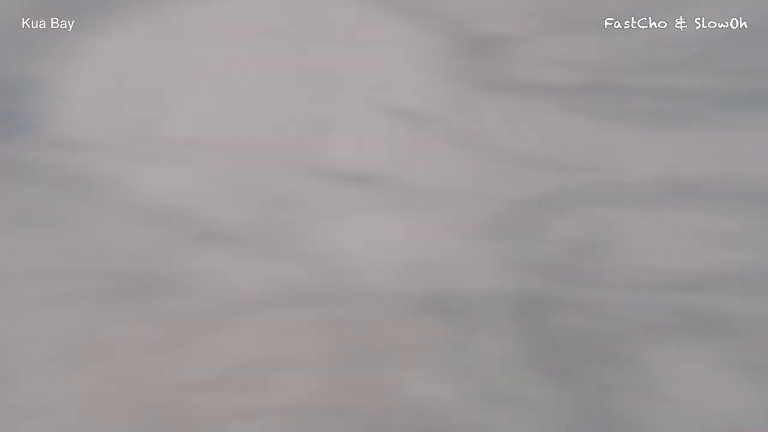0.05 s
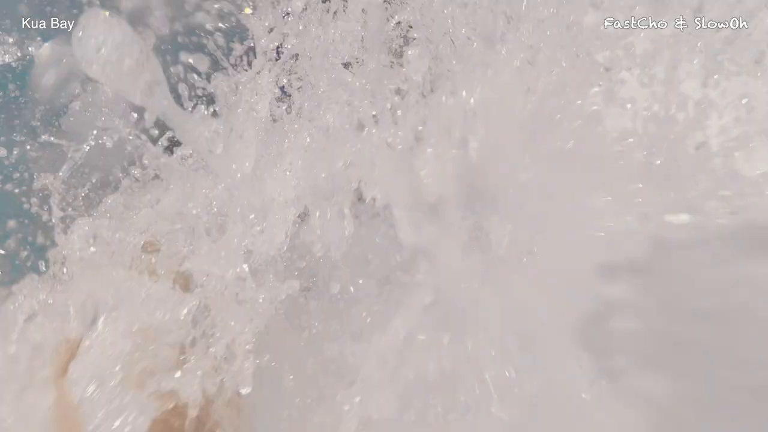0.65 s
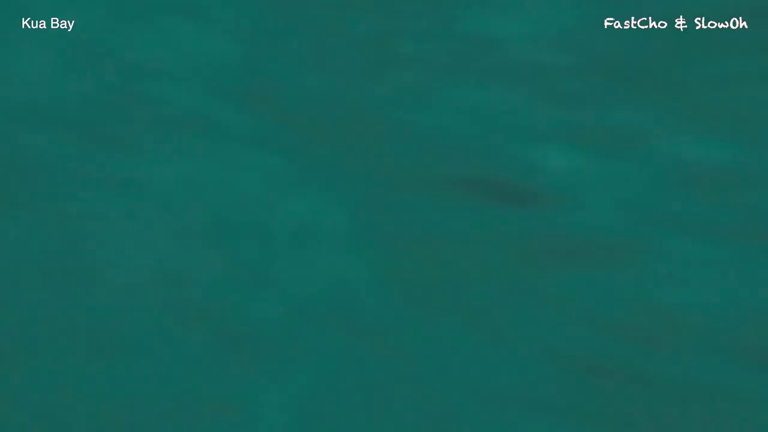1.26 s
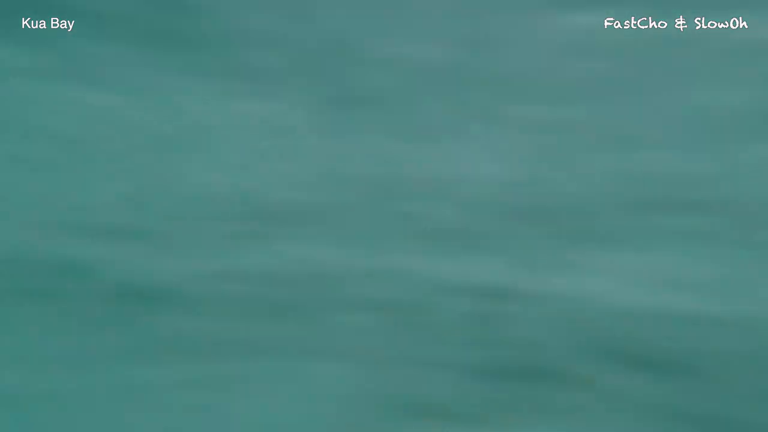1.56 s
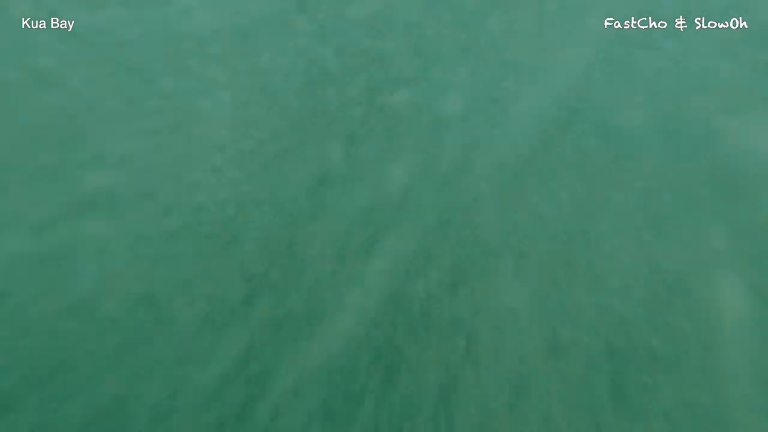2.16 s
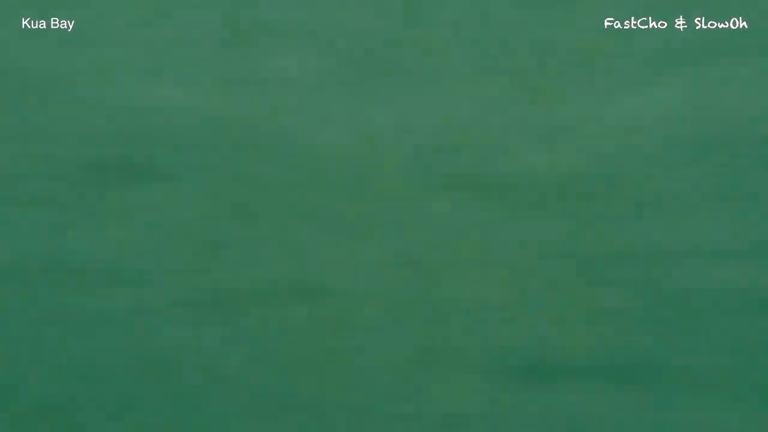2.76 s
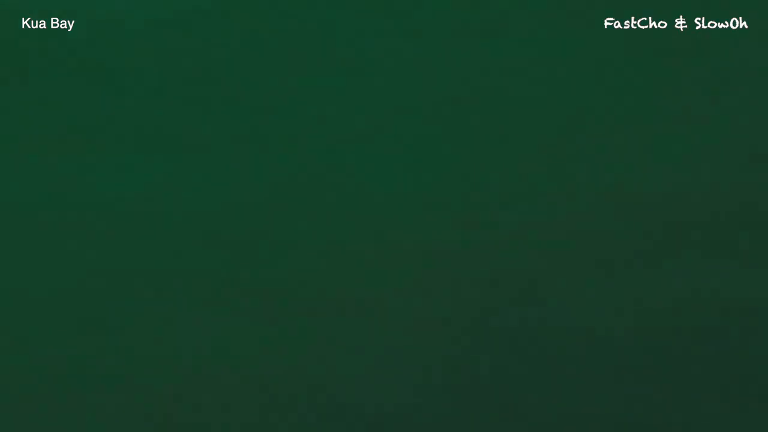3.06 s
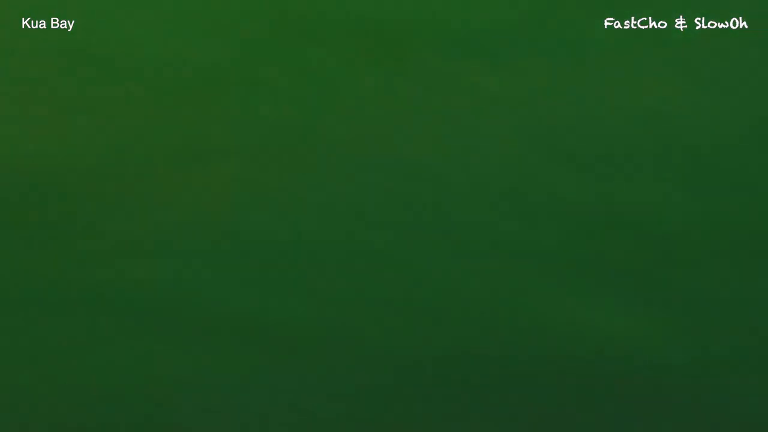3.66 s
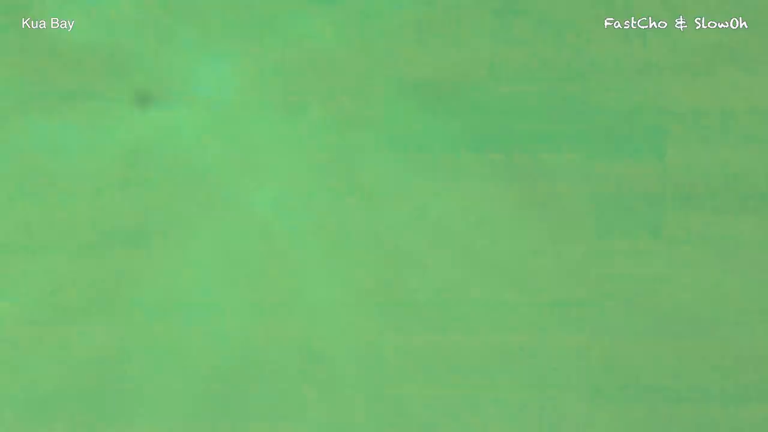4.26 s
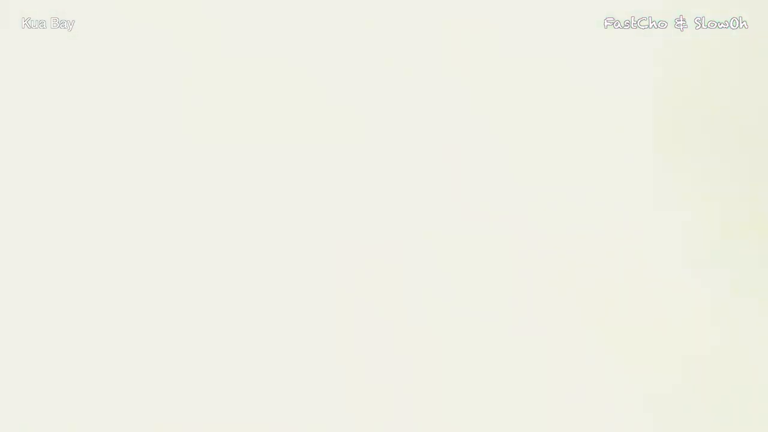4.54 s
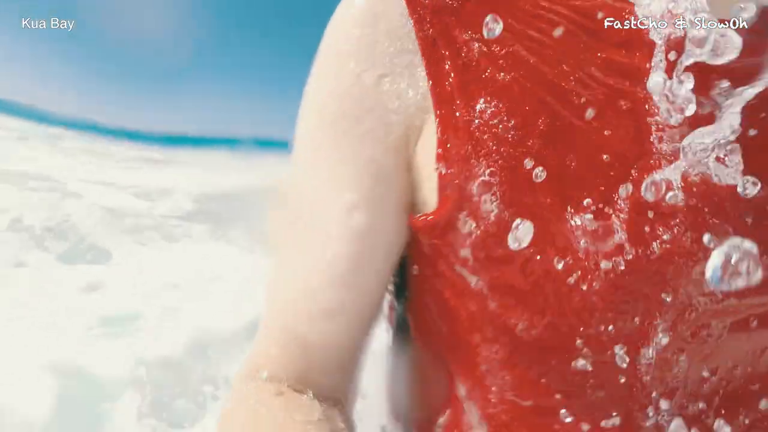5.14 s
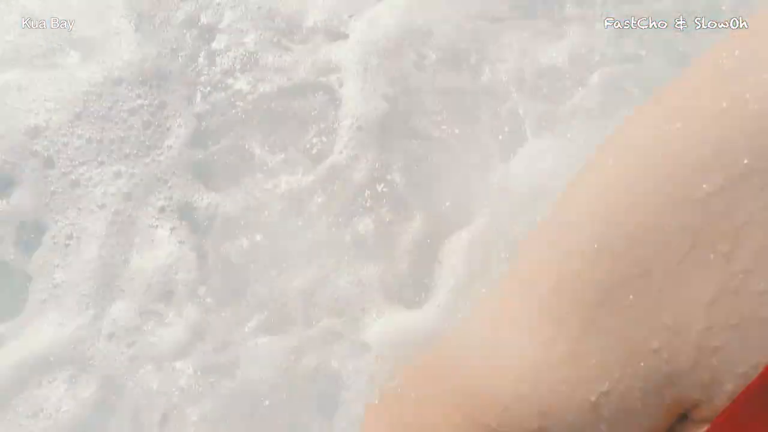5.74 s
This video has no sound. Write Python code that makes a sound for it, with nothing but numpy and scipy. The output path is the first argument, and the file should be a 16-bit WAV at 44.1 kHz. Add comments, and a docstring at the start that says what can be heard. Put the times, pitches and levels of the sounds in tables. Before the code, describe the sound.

A wave crashes over a waterproof camera, churning and gurgling underwater with sharp knocks, then gives way to quiet, muffled surf.

```python
"""A breaking wave runs over a small camera in a waterproof case, pushes it under and lets it up again.
Turbulent eddies buffet the case, and clouds of bubbles churn, gurgle and fizz: each bubble is a
damped oscillator, higher in pitch the smaller it is. Spray excites the modes of the plastic shell.
Back in the air, only the dull wash of the surf and a few splashes are transmitted through it."""
import sys
import numpy as np
from scipy import signal
from scipy.fft import rfft, irfft
from scipy.io import wavfile
from scipy.ndimage import uniform_filter1d

SR = 44100
rng = np.random.default_rng(int(sys.argv[2]) if len(sys.argv) > 2 else 0)


def wav_out(sig):
    """Save sig, one row per channel (or a flat mono array), as 16-bit PCM at SR to the path in sys.argv[1]."""
    wavfile.write(sys.argv[1], SR, np.round(np.clip(np.atleast_2d(sig).T, -1, 1) * 32767).astype(np.int16))


N = 264600


def amp(db):
    """Amplitude ratio of a level in decibels."""
    return 10 ** (np.asarray(db) / 20)


def unit(x):
    """Normalisation to rms 1."""
    return x / np.sqrt(np.mean(x ** 2) + 1e-20)


def add(mix, start_s, sound):
    """Superposition of a delayed sound on the mix."""
    part = mix[max(round(start_s * SR), 0):][:len(sound)]
    part += sound[:len(part)]


def colour(x, spectrum):
    """Minimum-phase filtering to a (Hz, dB) outline: being causal, it keeps the fronts of clicks sharp."""
    hz, db = np.transpose(spectrum)
    size = 16384
    bin_hz = abs(np.fft.fftfreq(size, 1 / SR)) + 1
    log_gain = np.log(amp(np.interp(np.log(bin_hz), np.log(hz), db)))
    response = np.exp(np.conj(signal.hilbert(log_gain)))
    taps = np.fft.ifft(response).real[:size // 2]
    return signal.oaconvolve(x, taps)[:len(x)]


def band(x, low_hz, high_hz):
    """Band-pass filtering with gentle slopes."""
    return signal.sosfilt(signal.butter(2, [low_hz, high_hz], "band", fs=SR, output="sos"), x)


def wander(rate_hz):
    """Low-pass noise: a smooth random fluctuation of rms 1."""
    hz = np.fft.rfftfreq(N, 1 / SR)
    return unit(irfft(rfft(rng.standard_normal(N)) * np.exp(-(hz / rate_hz) ** 2), N))


def steady(x, span_s):
    """Running normalisation to rms 1; fluctuations faster than the span remain."""
    size = int(span_s * SR)
    power = uniform_filter1d(uniform_filter1d(x ** 2, size), size)
    return x / np.sqrt(abs(power) + 1e-12)


def curves(rows):
    """Linear interpolation in time: one curve for each column after the first."""
    times, *columns = np.transpose(rows)
    return [np.interp(np.arange(N) / SR, times, column) for column in columns]


def swells(rows, rise_s=0.02, fall_s=0.04):
    """Summed trapezoidal envelopes, a dB curve per column: water arrives, stays and drains away."""
    total_db = 0
    for start, length, *rises_db in rows:
        full, end = start + min(rise_s, 1.1 * length), start + length
        envelope, = curves([(start, 0), (full, 1), (end, 1), (end + fall_s, 0)])
        total_db += np.outer(rises_db, envelope)
    return total_db


def pops(per_s, spread_db):
    """A Poisson process of clicks of either sign: many small, a few large."""
    size = amp(spread_db * np.minimum(rng.exponential(1, N), 5))
    return size * rng.choice([-1, 1], N) * (rng.random(N) < per_s / SR)


def bubbles(low_hz, high_hz, per_s, cycles, spread_db, sizes=24):
    """Bubble resonance: each falls 60 dB over its cycles while rising a little in pitch."""
    births = pops(per_s, spread_db)
    size_class = rng.integers(0, sizes, N)
    cloud = np.zeros(N)
    for k, hz in enumerate(np.geomspace(low_hz, high_hz, sizes)):
        age = np.arange(0, 1, hz / (cycles * SR))
        ring = np.sin(2 * np.pi * cycles * age * (1 + 0.07 * age)) * amp(-60 * age)
        ring *= 1 - np.exp(-age / 0.061)  # the neck takes a moment to pinch off
        cloud += signal.oaconvolve(births * (size_class == k), ring * np.sqrt(hz))[:N]
    return unit(cloud)


def swing(peak_db, hz, t60):
    """Pressure of a damped oscillator with a rounded onset."""
    t = np.arange(SR // 4) / SR
    wave = np.sin(2 * np.pi * hz * t) * amp(-60 * t / t60) * (1 - np.exp(-t / (0.064 * t60)))
    return amp(peak_db) * wave / abs(wave).max()


# Spectrum of the buffeting: (frequency [Hz], level [dB])
EDDY_SPECTRUM = [(8, -0.5), (20, -1.5), (36, 3.5), (70, -5.5), (110, -11.5), (180, -34), (400, -52),
                 (900, -100)]

def eddies(span_s):
    """Turbulent pressure fluctuations shake the case with a low rumble."""
    return steady(colour(rng.standard_normal(N), EDDY_SPECTRUM), span_s)


# Spectrum of the surf inside the shell: (frequency [Hz], level [dB])
WASH_SPECTRUM = [(60, -12), (130, -2.5), (240, 3), (330, -6.5), (560, -17), (930, -9), (1150, -21),
                 (1400, -15.5), (1750, -23), (3000, -31), (8000, -56)]

def surf_wash():
    """Transmission loss in the shell dulls the airborne noise of the surf."""
    wash = steady(colour(rng.standard_normal(N), WASH_SPECTRUM), span_s=0.081)
    return wash * amp(2.7 * wander(43))


# Spectrum of settling foam: (frequency [Hz], level [dB])
HISS_SPECTRUM = [(1000, -15), (1950, -7), (2350, -4), (2650, 0.5), (2950, -8), (3400, -4), (3900, -4.5),
                 (5000, -14), (6800, -16), (9000, -22), (11000, -27), (15000, -26)]

def settling_foam():
    """Tiny bursting bubbles add incoherently to a hiss; a few ring out singly."""
    hiss = unit(colour(rng.standard_normal(N) + 1.23 * unit(pops(3000, 6.4)), HISS_SPECTRUM))
    return hiss + amp(-14.5) * bubbles(2800, 9000, per_s=250, cycles=19, spread_db=14)


# Levels above the surface: (time [s], rocking [dB], wash [dB])
SHORE_LEVELS = [(4.8, -51, -52.5), (4.97, -57, -60), (5.4, -58, -56), (5.55, -38.5, -52.5),
                (5.7, -37.5, -54), (6, -36, -51.5)]
# Wavelets lapping at the case: (start [s], duration [s], wash rise [dB], hiss rise [dB])
WAVELETS = [(5.46, .04, 10.5, 3), (5.575, 0.06, 10.5, 15), (5.74, 0.072, 4, 5.5), (5.89, 0.028, 10, -8)]

def shore():
    """Amplitude modulation in air: the case rocks, and wavelets lift the wash and the hiss."""
    rock_db, wash_db = curves(SHORE_LEVELS)
    lap_db, froth_db = swells(WAVELETS)
    return (amp(rock_db + 4.5) * eddies(span_s=0.043)
            + amp(wash_db + lap_db + 5) * surf_wash()
            + amp(wash_db + froth_db + 1) * settling_foam())


# Short ringing tones near the case: (time [s], peak level [dB], frequency [Hz])
SHORT_RINGS = [(0.487, -5, 920), (.814, -7, 2440), (1.776, -6.5, 266), (2.53, -3.5, 570),
               (3.108, -12, 3200), (3.342, -12.5, 2600), (3.350, -2, 624), (3.3497, -0.5, 1217),
               (4.134, -12, 3190), (4.24, -11, 1150), (4.43, -5, 2030), (4.876, -32, 3330),
               (4.894, -20, 2520), (5.137, -47, 4540), (5.181, -40, 2050), (5.196, -42, 1316),
               (5.479, -36, 1000), (5.591, -18, 3700), (5.916, -32, 970)]

def plinks():
    """Free oscillation: bubbles, drips and a hard knock's midrange ring; higher tones decay sooner."""
    mix = np.zeros(N)
    for start, peak_db, hz in SHORT_RINGS:
        add(mix, start, swing(peak_db, hz, t60=0.0097 * (2000 / hz) ** 0.28))
    return mix


# Masses of water striking the case: (time [s], peak level [dB], frequency [Hz])
SHOVES = [(0.105, -5, 65), (0.542, -8.5, 95), (.817, -3.5, 48), (.848, 4, 58.5), (0.916, -4.5, 113),
          (.931, -4.5, 204), (1.131, -5, 70), (1.269, -1, 167), (1.288, -3, 85), (1.46, -4.5, 79),
          (1.765, -5, 178), (2.065, -7.5, 44), (2.505, -0.5, 40), (2.553, -13, 56.6), (2.773, -7, 45.2),
          (2.96, 0.5, 126), (3.257, -7.5, 37.5), (3.351, 0, 186), (3.358, -1.5, 53), (3.415, -9.5, 55.5),
          (4.12, 0.5, 60.4)]

def thumps():
    """Heavily damped oscillation: water shoves the case, and higher thumps decay sooner."""
    mix = np.zeros(N)
    for start, peak_db, hz in SHOVES:
        add(mix, start, swing(peak_db, hz, t60=0.049 * (60 / hz) ** 0.83))
    return mix


# Modes of the plastic case, main mode first: (frequency [Hz], level [dB], 60 dB decay time [s])
CASE_MODES = [(2280, 31, 0.0082), (1890, -9, .004), (3404, -8.5, 0.0079)]
# Spectrum of a landing drop: (frequency [Hz], level [dB])
TICK_SPECTRUM = [(2500, -17.5), (4500, 4.5), (5600, 3.5), (6700, 0.5), (9000, -6), (11400, -13.5),
                 (15000, -15.5)]

def knock(level_db, hardness_db, splatter_s):
    """Impact excitation of modes: a harder drop gives less dull push, more tick and more upper mode."""
    push_db = level_db - 9 - 1.16 * hardness_db
    tick_db = level_db - 19 + hardness_db
    upper_db = 0.43 * hardness_db - 2
    t = np.arange(SR // 20) / SR
    spread = t / max(splatter_s, 2e-4)
    # a broad splash takes a moment to land in full
    droplets = rng.standard_normal(len(t)) * np.exp(-spread) * (1 - np.exp(-spread / 0.23))
    force = 0.23 * droplets + (t == 0)
    shell = sum(amp(db + upper_db * (hz > CASE_MODES[0][0]) - 60 * t / t60) * np.cos(2 * np.pi * hz * t)
                for hz, db, t60 in CASE_MODES)
    ring = unit(band(signal.fftconvolve(force, shell)[:len(t)], 1480, 4100))
    push = unit(band(force, 600, 1700))
    db_per_octave = 0.35 * max(tick_db + 31, 0)  # louder ticks are brighter
    tick = unit(colour(droplets, [(hz, db + db_per_octave * np.log2(hz)) for hz, db in TICK_SPECTRUM]))
    blow = amp(level_db - 3) * ring + amp(push_db + 2.1) * push + amp(tick_db + 1.5) * tick
    return blow * np.sqrt(0.0065 * SR / len(t))  # levels refer to the energy spread over 6.5 ms


# Drops and slaps on the case: (time [s], level [dB], hardness [dB], splatter duration [s])
IMPACTS = [(.0424, -14.5, 4.5, 0.0041), (.0654, -12.5, 6, 0.003), (0.0724, -15.5, 4, 0.0023),
           (.103, -2, -2, 0.0049), (0.143, -14, 3.5, .003), (.1501, -11, 2.5, 0.0039),
           (0.2037, -18.5, 1.5, 0.0029), (0.216, -13.5, 6, .0023), (.263, -16.5, 3, .0006),
           (0.328, -26, -12, 0.0011), (.4014, -18, 2, 0.0063), (.4311, -19.5, 8.5, 0.0026),
           (0.4694, -11, -0.5, 0.00086), (.4835, -14, -3, 0.0058), (0.5418, -10.5, 2.5, 0.0034),
           (.5938, -18, 3, 0.00045), (0.626, -28, 8.5, 0.0021), (0.6682, -26.5, -4.5, 0.00023),
           (0.686, -28.5, 8.5, 0.0099), (.735, -25.5, 1.5, 0.0003), (0.775, -20, -0.5, 0.00061),
           (0.792, -19, 10, 0.00088), (.8506, -9.5, -9, .002), (1.114, -20.5, -7.5, 0.00088),
           (2.0632, -14, 4.5, 0.0037), (2.1351, -15.5, 1, 0.0027), (2.1581, -15.5, 8.5, 0.00038),
           (2.4306, -25, 15.5, 0.0016), (2.549, -12.5, -4.5, 0.0018), (3.11, -22, -2.5, 0.00032),
           (3.3506, -12, 8, .0012), (3.4526, -25, 2.5, 0.0054), (3.663, -30, 3, 0.00067),
           (4.0927, -31, 18.5, 0.00041), (4.1633, -35.5, 25, 0.00056), (4.4305, -24, 13, 0.00087),
           (4.8418, -38, 5.5, .0004), (4.8936, -29.5, 6, 0.00016), (5.589, -26, 9, 0.00087),
           (5.6027, -34, -5, 0.0045), (5.6245, -35.5, 14.5, 0.0014)]

def spray_knocks():
    """Linear superposition of separate impacts on the shell."""
    mix = np.zeros(N)
    for start, *impact in IMPACTS:
        add(mix, start, knock(*impact))
    return mix


# Spectrum of big air pockets: (frequency [Hz], level [dB])
CHURN_SPECTRUM = [(50, -34.5), (110, 3.5), (215, 0), (300, -8), (450, -13.5), (700, -17), (1500, -38),
                  (3000, -96.5)]

def churn(surge):
    """Large volumes of air resonate low; the surges modulate their pulses."""
    glugs = bubbles(130, 385, per_s=110, cycles=6.8, spread_db=2)
    pockets = unit(colour(pops(900, 2.54) * amp(2.6 * surge), CHURN_SPECTRUM))
    return steady(pockets + amp(-7) * glugs, span_s=0.038)


# Spectrum of middling bubbles: (frequency [Hz], level [dB])
GURGLE_SPECTRUM = [(200, -25.5), (450, -6.5), (650, -9.5), (900, 4), (1200, 6), (1550, 3.5), (2000, -4),
                   (3200, -49), (6000, -69.5)]

def gurgle(patter, stir):
    """Middling bubbles resonate in the midrange over the patter of the water."""
    rings = bubbles(587, 1780, per_s=400, cycles=18, spread_db=2.5)
    cloud = unit(colour(patter, GURGLE_SPECTRUM)) + amp(-8.5) * rings
    return steady(cloud * amp(1.94 * stir), span_s=0.025)


# Spectrum of rushing foam: (frequency [Hz], level [dB])
FOAM_SPECTRUM = [(700, -37.5), (1500, -8.5), (1900, -4), (2300, 0), (2600, -1), (3000, -7), (3450, -4.5),
                 (4200, -12.5), (5200, -17.5), (8000, -56.5)]

def foam(patter, stir):
    """Many small bubbles add incoherently to a bright rush."""
    rush = unit(colour(patter + 0.43 * rng.standard_normal(N), FOAM_SPECTRUM))
    rings = bubbles(1980, 3840, per_s=450, cycles=24, spread_db=3)
    return steady((rush + amp(-6.5) * rings) * amp(1.48 * stir), span_s=0.048)


# Spectrum of the tiniest bubbles: (frequency [Hz], level [dB])
FIZZ_SPECTRUM = [(2500, -23), (4500, -2), (5700, 1.5), (7000, -2), (9000, -5.5), (10500, -10.5),
                 (13000, -10.5), (15200, -15)]

def fizz(patter, stir, fizz_db):
    """The tiniest bubbles resonate highest; their ticks stand out where the masking hiss thins."""
    rings = bubbles(4650, 12500, per_s=550, cycles=20, spread_db=5.5)
    ticks = unit(colour(rings, FIZZ_SPECTRUM)) * amp(-3.5 - 0.43 * (fizz_db + 34.5))
    hiss = unit(colour(patter + 1.8 * rng.standard_normal(N), FIZZ_SPECTRUM))
    return steady(hiss * amp(1.28 * stir) + ticks, span_s=0.026)


# Current around the case: (time [s], buffeting [dB], churning [dB], rush of foam [dB])
CURRENT_LEVELS = [(0, -19, -21, -29), (.19, -28, -32, -29.5), (.59, -20, -27.5, -28),
                  (.63, -36, -43.5, -53), (.78, -39, -41.5, -42.5), (.82, -37, -26, -36),
                  (.98, -15, -16, -32.5), (1.53, -20.5, -24, -37), (1.85, -18.5, -27.5, -28),
                  (2.25, -19.5, -30.5, -34.5), (2.85, -17.5, -27.5, -33), (3.1, -15.5, -24.5, -28.5),
                  (3.26, -26.5, -36, -41.5), (3.7, -30, -40, -43), (4.09, -32.5, -34, -37.5),
                  (4.16, -15.5, -34.5, -26.5), (4.69, -13.5, -16.5, -32.5), (4.8, -46, -64.5, -58.5)]
# Passing bubble clouds: (start [s], duration [s], rush rise [dB], churning rise [dB], fineness [dB])
BUBBLE_CLOUDS = [(-.03, 0.051, 10.5, 4, 1), (.39, .13, 6, 7, -2), (.788, 0.043, 9.5, 8, 1.5),
                 (.905, 0.011, 1, 10, 0.5), (1.09, 0.056, 7.5, 3.5, -1), (1.16, 0.091, 6.5, 2, 0.5),
                 (1.25, 0.053, 9, 3, -0.5), (1.58, 0.065, 7, 7, -2), (1.65, 0.11, 4, 3, -0.5),
                 (1.755, 0.049, 3, 11, 0), (1.81, .13, 4, 5, -0.5), (2.04, 0.084, 7, 7.5, 0.5),
                 (2.12, 0.094, 3.5, 4, 3.5), (2.285, 0.036, 15.5, 7, 0.5), (2.41, .04, 1, 5, 8),
                 (2.51, 0.044, 5.5, 14, -2.5), (2.565, 0.085, 9, 6.5, -2.5), (2.71, 0.059, 7.5, 7.5, -0.5),
                 (2.91, 0.11, 6, 5.5, 0), (3.28, 0.066, 8, 3, -2.5), (3.45, 0.12, 3.5, -1, -0.5),
                 (3.76, 0.13, 5.5, -0.5, 1.5), (3.92, 0.066, 10, 4, 3), (4.1, 0.067, -3, -3, 0),
                 (4.16, 0.048, 1, 2, 3), (4.39, 0.12, 5.5, 1, 1), (4.52, 0.081, 6, 2, 2.5),
                 (4.61, 0.062, 5.5, 5, 1)]

def breaking_wave():
    """Turbulent two-phase flow: one current sets all levels, and shared surges stir the bubbles."""
    buffet_db, churn_db, rush_db = curves(CURRENT_LEVELS)
    gush_db, heave_db, fine_db = swells(BUBBLE_CLOUDS)
    rush_db += gush_db
    churn_db += heave_db
    buffet_db += 0.7 * heave_db
    lumps_db = 2 * wander(8)  # passing eddies make the rumble uneven
    # before the plunge, separate drops patter and the breaking wave gurgles louder
    spray, breaking = curves([(0.8, 0.82, 0.82), (0.95, 0.022, 0.22)])
    # water running off the case gurgles on as its fizz fades
    draining, = curves([(4.68, 0), (4.79, 0.96)])
    gurgle_db = rush_db - 5.5 + 0.4 * (churn_db - rush_db) - fine_db + 8.5 * breaking + 17 * draining
    fizz_db = -42 + 1.106 * (rush_db + 30.5) + fine_db - 7 * draining  # grows faster than the rush
    surge = wander(51)
    stir = (1 + 0.5 * spray) * (surge + 0.7 * wander(300))
    patter = unit(pops(4000, 4.2)) + 1.35 * spray * unit(pops(300, 0.63))
    return (amp(buffet_db + lumps_db + 1.77) * eddies(span_s=0.03)
            + amp(churn_db + lumps_db + 0.84) * churn(surge)
            + amp(gurgle_db - 0.5) * gurgle(patter, stir)
            + amp(rush_db + 1.5) * foam(patter, stir)
            + amp(fizz_db + 1.38) * fizz(patter, stir, fizz_db))


def scene():
    """Superposition: the wave gives way to the shore as the case surfaces; transients sound over both."""
    transients = spray_knocks() + thumps() + plinks()
    surfaced, = curves([(4.78, 0.0044), (4.87, 0.78)])
    return ((1 - surfaced) * breaking_wave() + surfaced * shore() + transients)[None]


def record(dry):
    """Soft saturation of the microphone on the hardest blows, then a low-pass band limit."""
    knee, cutoff_hz = 6, 15500
    saturated = dry / (1 + abs(dry) ** knee) ** (1 / knee)
    low_pass = signal.firwin(511, cutoff_hz, window=("kaiser", 9), fs=SR)
    return signal.oaconvolve(saturated, low_pass[None], "same")


dry = scene()
out = record(dry)
wav_out(out)
```